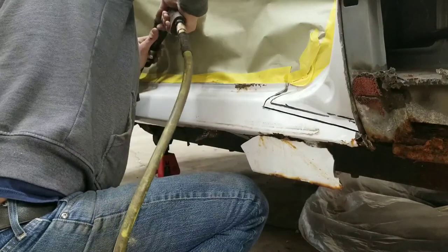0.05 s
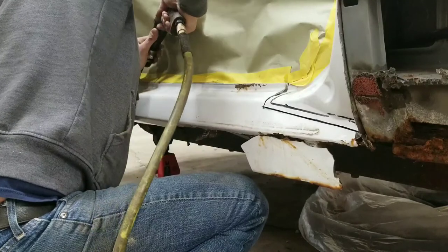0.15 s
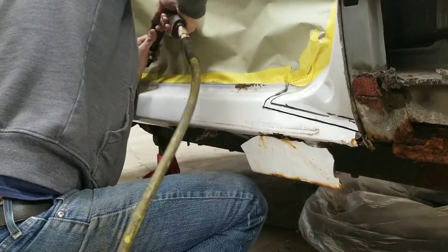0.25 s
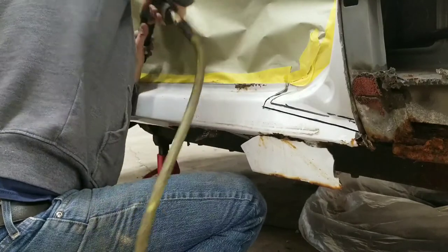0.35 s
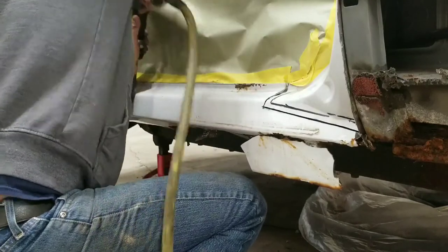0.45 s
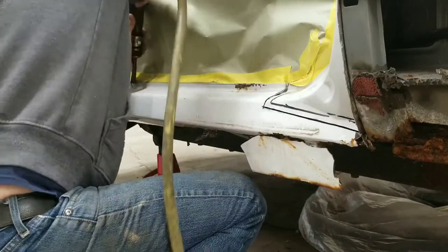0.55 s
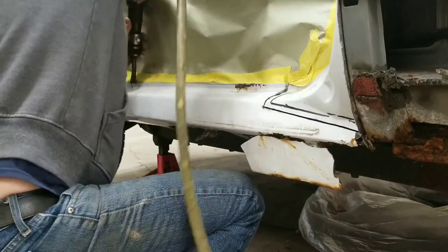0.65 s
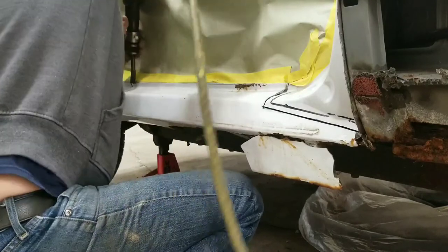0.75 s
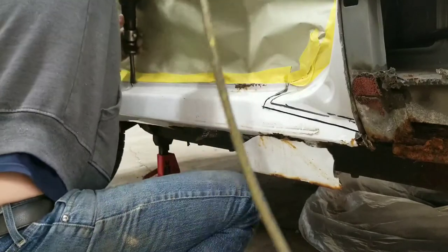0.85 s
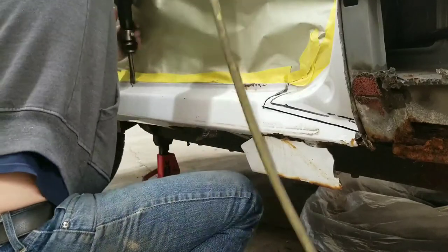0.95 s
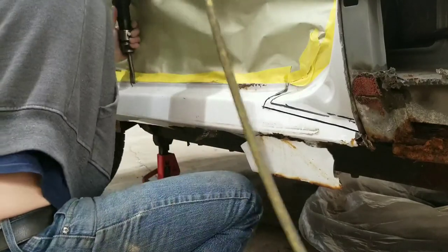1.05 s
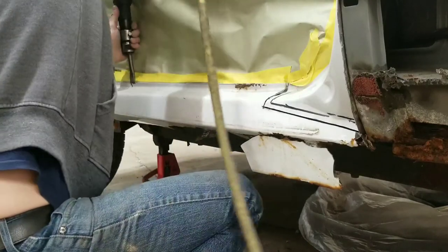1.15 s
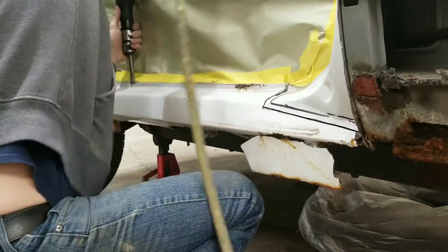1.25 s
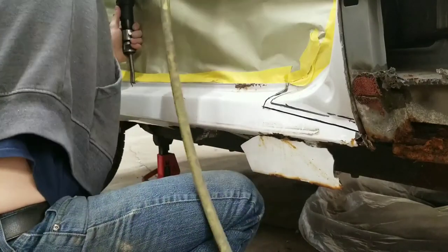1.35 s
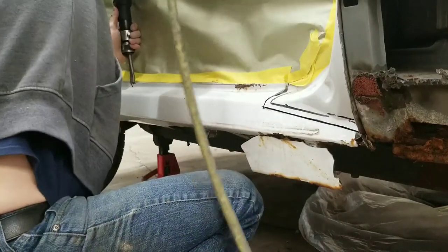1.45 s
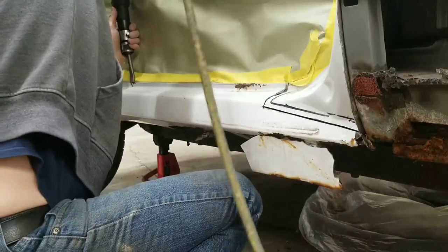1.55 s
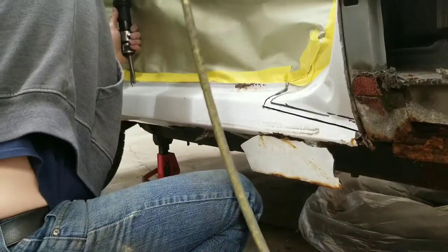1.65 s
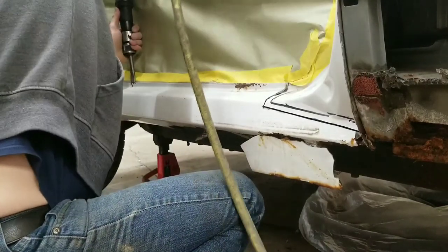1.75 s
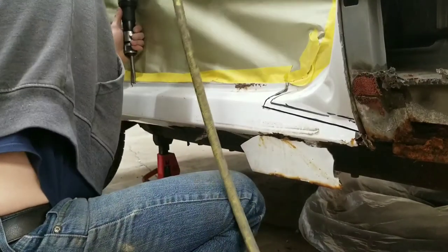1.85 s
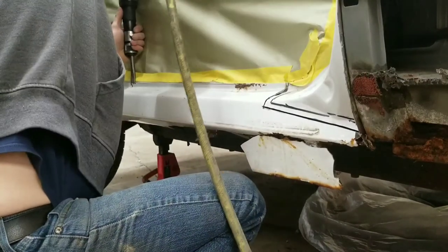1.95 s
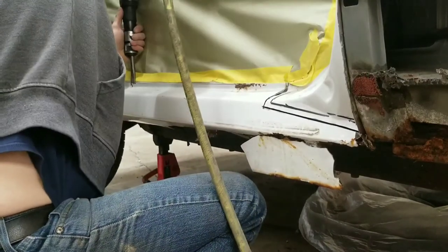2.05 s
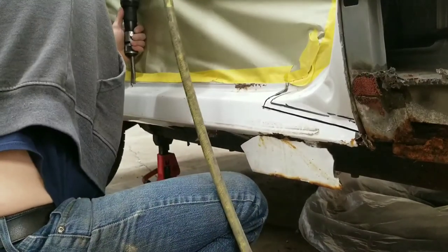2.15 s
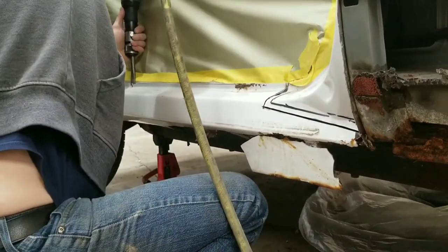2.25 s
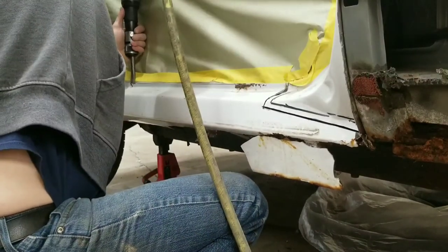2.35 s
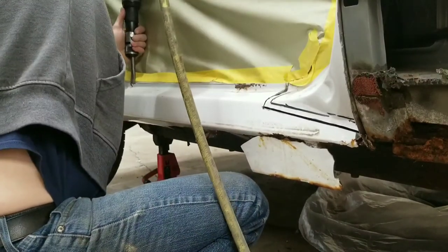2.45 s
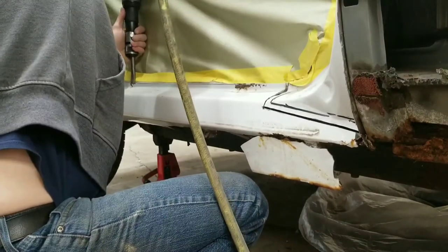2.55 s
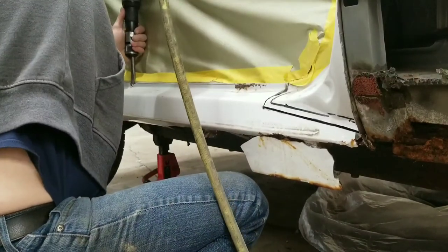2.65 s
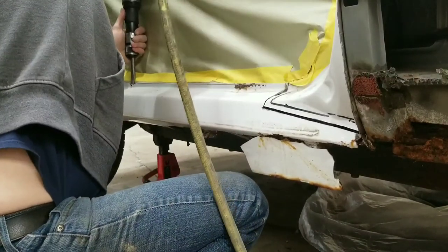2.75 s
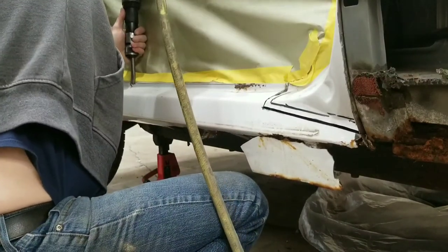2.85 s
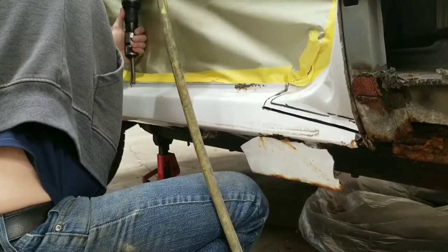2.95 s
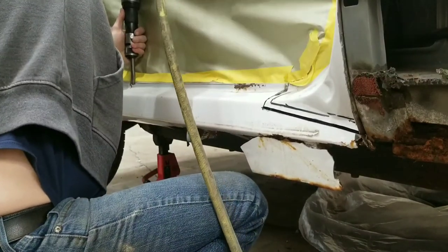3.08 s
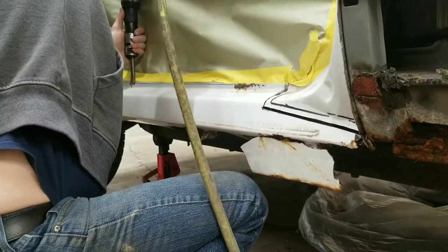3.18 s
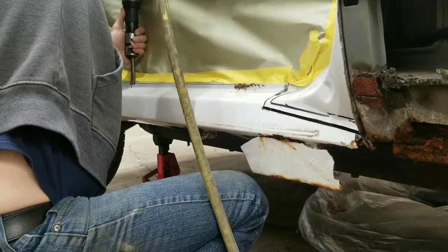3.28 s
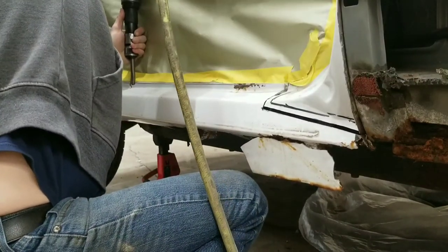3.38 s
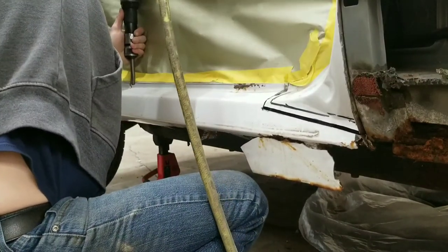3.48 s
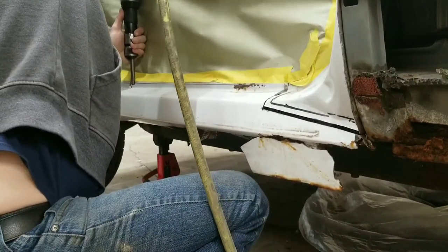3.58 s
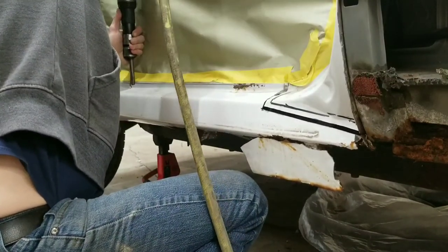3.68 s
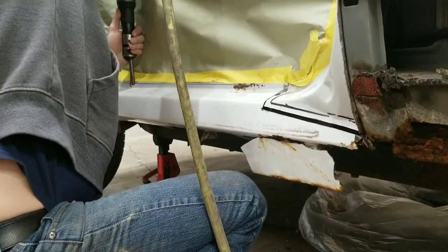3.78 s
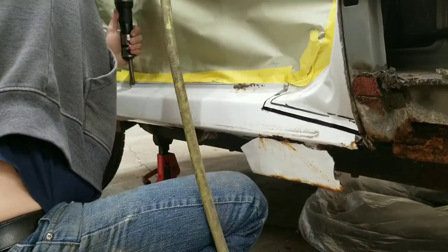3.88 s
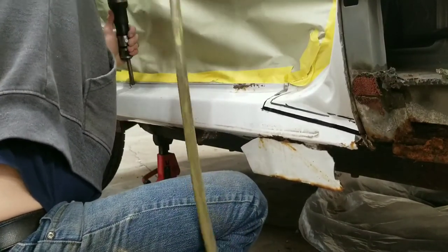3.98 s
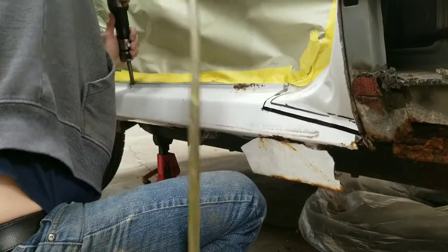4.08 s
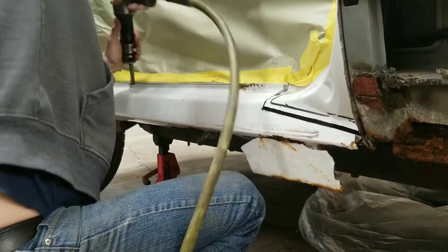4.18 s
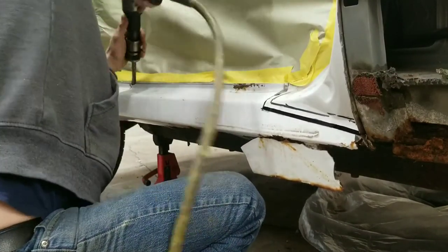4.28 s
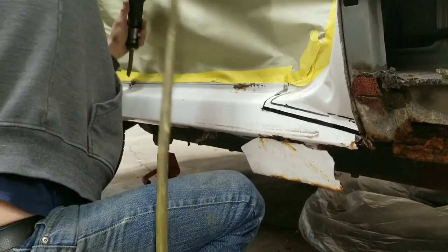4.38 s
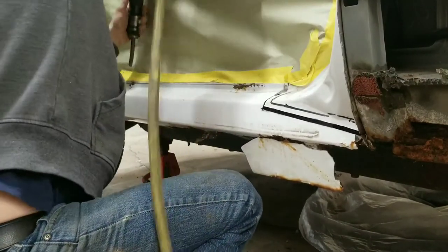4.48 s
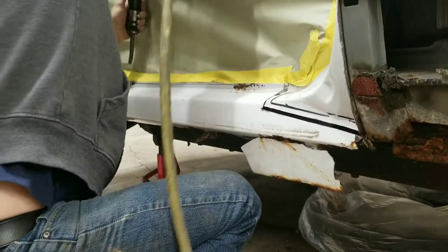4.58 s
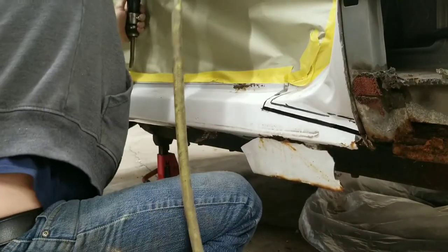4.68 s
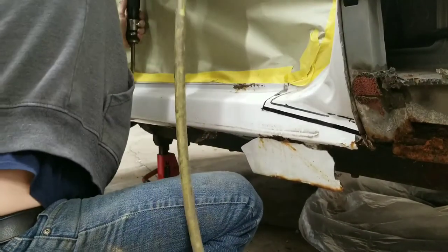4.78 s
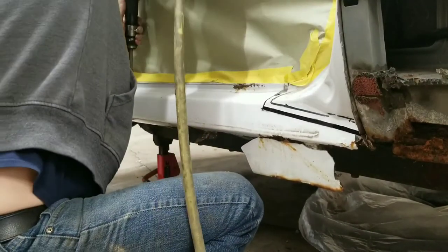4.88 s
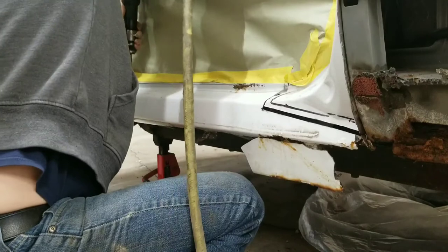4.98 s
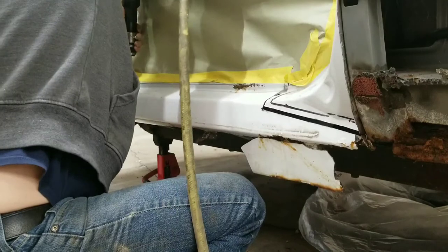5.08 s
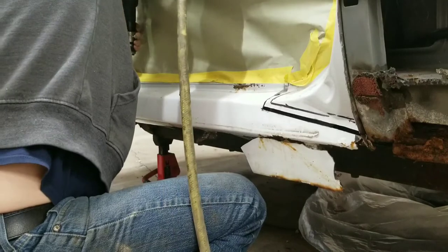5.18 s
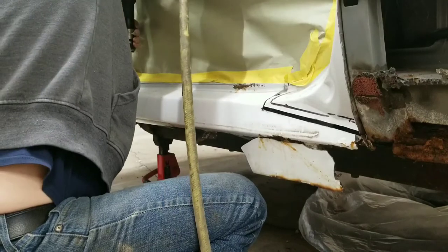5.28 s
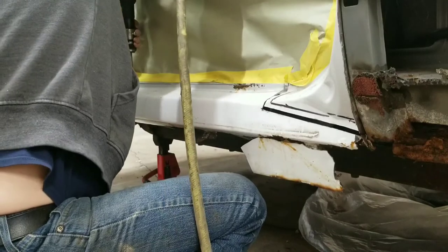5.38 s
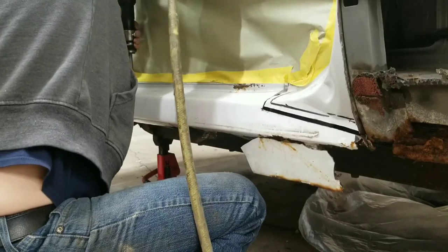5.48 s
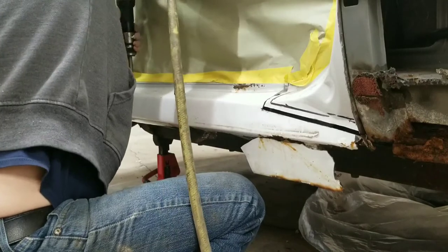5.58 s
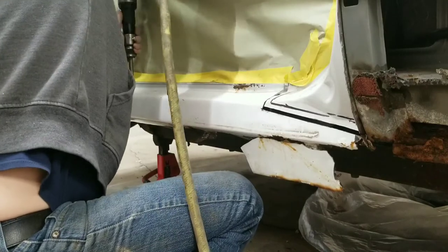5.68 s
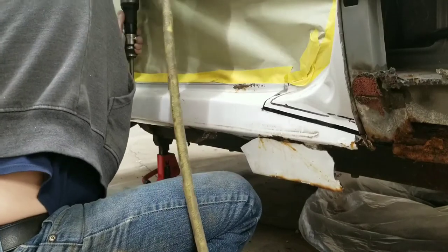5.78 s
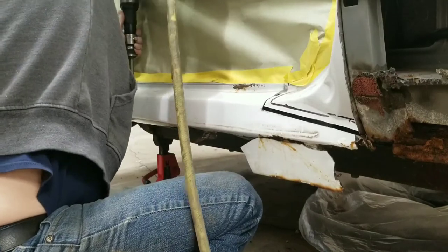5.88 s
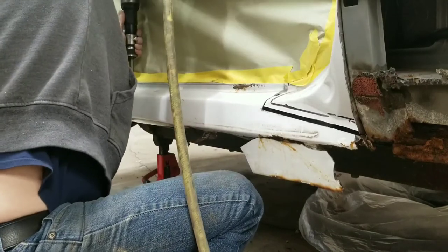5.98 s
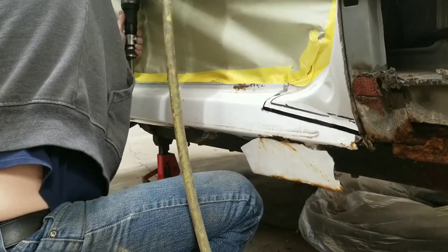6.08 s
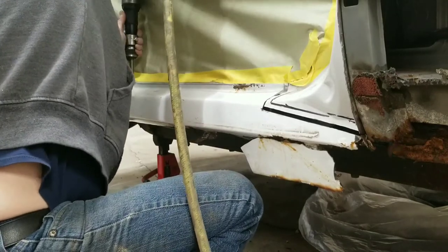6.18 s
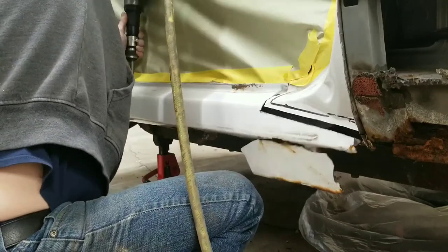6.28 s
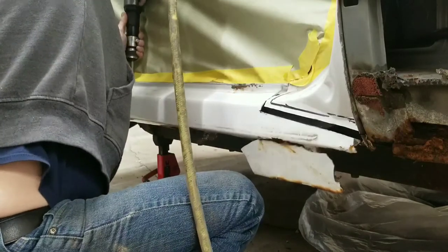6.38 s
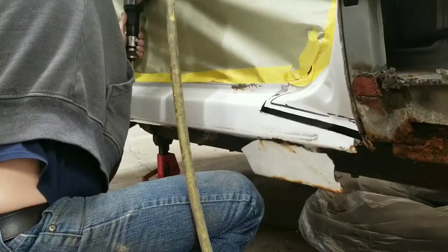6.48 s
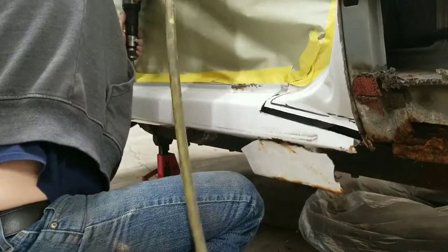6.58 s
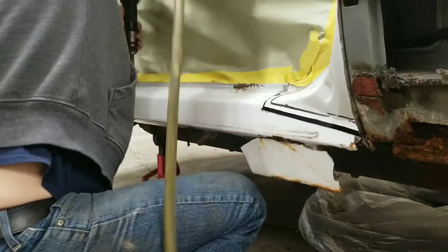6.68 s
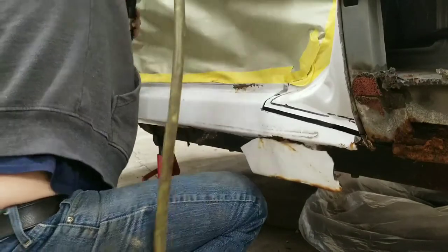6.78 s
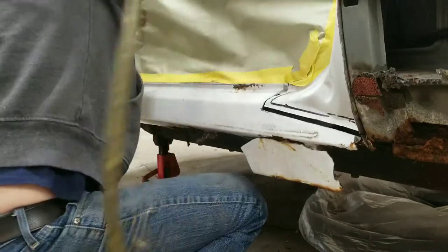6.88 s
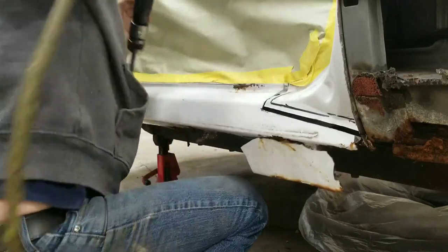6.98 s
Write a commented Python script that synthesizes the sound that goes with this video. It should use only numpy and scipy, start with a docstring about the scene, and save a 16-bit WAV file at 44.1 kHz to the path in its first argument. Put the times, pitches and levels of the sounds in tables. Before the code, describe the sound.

An air hammer chisels a car's steel sill in short, loud, rattling bursts, with light tool bumps and clothes rustling in a reverberant workshop.

```python
"""An air hammer chisels at the welds of a car's steel sill in a reverberant workshop. It opens with one
blow that cracks, rings the chisel and shakes the panel. Tool, hose and clothes shift, the tip bites the
sheet edge, and seven short bursts follow, exhaust air now and then hitting the left microphone port.
In each burst the blows slow and weaken as the air runs down; most end in a lone clack as the piston falls
back. After more bumps and rustling come two last bursts and a final shift of the tool."""
import sys
import numpy as np
from scipy import signal
from scipy.fft import rfft, irfft, next_fast_len
from scipy.io import wavfile
from scipy.ndimage import map_coordinates

SR = 44100
rng = np.random.default_rng(int(sys.argv[2]) if len(sys.argv) > 2 else 0)


def int16_out(signal):
    """Quantize to a 16-bit WAV file."""
    q = np.round(np.clip(np.atleast_2d(signal).T, -1, 1) * 32767)
    wavfile.write(sys.argv[1], SR, q.astype(np.int16))


N = 310464
HIT_TIME = np.arange(SR // 4) / SR  # seconds within one impact

# trigger pulls: start/s, blows, full-speed gap/s, start-up lag/s, last gap/s, piston fall-back/s,
# level/dB, boom trim/dB, sizzle trim/dB, clack level/dB
TRIGGER_PULLS = [(0.0, 1, .04, 0, .04, .146, -3, -4.5, 0, -32),
                 (1.568, 4, .0306, .0102, .062, .122, .5, -1, 3, -22),
                 (1.953, 5, .0337, .0075, .0508, .093, .5, -2.5, 3.5, -17),
                 (2.278, 5, .0295, .0027, .0502, .087, 0, -6, 3.5, -23),
                 (2.618, 6, .0281, .0014, .0595, .107, 0, -8, -1, -22.5),
                 (2.979, 5, .0273, .0018, .0546, .092, 0, -7, 1.5, -21),
                 (3.265, 5, .0272, .0017, .0483, .078, 0, -7, 1, -21),
                 (3.55, 6, .0286, 0, .0645, .115, 1, -7, -1, -28),
                 (5.911, 5, .0285, .0068, .0552, .12, 1, -4, -1.5, -22),
                 (6.178, 6, .026, .0033, .0502, .083, 1.2, -4.5, -8, -23)]
# exhaust air on the left port: t/s, level/dB
EXHAUST_PUFFS = [(0.002, -32), (2.032, -7), (2.068, -16), (2.314, -6.5), (3.008, -12.5)]
# tool and hose bump the sill: t/s, level/dB, thud trim/dB
SILL_BUMPS = [(.407, -50.5, 4), (.78, -34.5, -32), (.854, -39, -25), (1.057, -44.5, -15),
              (1.141, -41.5, -11), (1.178, -32, -10), (1.31, -33.5, -36), (3.914, -32, -16),
              (4.511, -49, -29), (4.637, -47, -11), (4.719, -43.5, -19), (4.926, -38.5, -31),
              (5.366, -39, -1.5), (5.568, -24.5, -5), (5.747, -36, -19), (6.626, -24.5, -17)]
# shifts of body and hose: peak t/s, time to sink 20 dB/s, rub/dB, rustle/dB, rumble/dB
BODY_SHIFTS = [(.56, 0.15, -57.5, -67, -66), (.785, 0.2, -61, -53, -84), (1.19, 0.16, -65, -59, -68),
               (1.42, 0.14, -62.5, -75, -71), (1.505, 0.13, -54, -52, -50), (4.285, 0.094, -56, -60.5, -62),
               (4.46, 0.16, -62.5, -57.5, -84), (4.965, 0.16, -61.5, -73.5, -75),
               (5.37, 0.1, -46, -56, -54), (5.575, 0.11, -39.5, -51, -42.5), (5.63, 0.24, -51, -59.5, -44),
               (5.75, .15, -58, -58.5, -57), (5.905, 0.14, -49, -47.5, -41.5),
               (6.65, 0.088, -40.5, -43.5, -55)]
# the tool's body knocks on the masked panel: t/s, level/dB
PANEL_KNOCKS = [(.558, -67), (1.183, -48.5), (4.968, -56), (5.04, -62), (5.24, -54), (5.277, -45.5),
                (5.335, -40.5), (5.529, -37)]

# ringing modes of the steel: f/Hz, level/dB, t60/s
SILL_MODES = [(138, -8.5, 0.12), (166.6, -6.5, 0.14), (231.3, -0.5, 0.19), (305.3, -4, 0.18),
              (380.8, -5, 0.33), (506.5, 4, 0.15), (564, -6.5, .16), (730, -10, 0.16), (741, 1, 0.15),
              (822, -5.5, 0.11), (974, -4, 0.13), (1296, -6.5, 0.37), (1613, -7.5, 0.49)]
CHISEL_MODES = [(1699, 0, 0.017), (1477, -2.5, 0.015), (2340, -8.5, 0.014), (3040, -23, 0.026),
                (4488, -27.5, 0.014), (6130, -23, 0.011), (7800, -22.5, 0.032)]
TIP_MODES = [(1580, -4.5, 0.042), (1965, -7.5, 0.16), (2490, 1.5, 0.043), (2730, -11, 0.1),
             (3010, -13, 0.092), (3610, -5.5, 0.055)]  # chisel tip on the sheet edge

# noise colours: f/Hz, relative spectral density/dB
ROOM_TONE_EQ = [(25, -11), (55, 7.5), (120, -12.5), (400, -13), (1500, -10.5), (4000, -22), (15000, -25.5)]
CRACK_EQ = [(300, -21.5), (900, -8), (1700, -5), (2400, -9), (3500, -13.5), (7000, -13.5), (9500, -21.5),
            (16000, -10.5)]  # steel on steel
SIZZLE_EQ = [(2000, -50), (7000, -42), (9500, -18), (12000, -7.5), (14500, 4.5), (16000, 3.5)]  # the steel's highest modes
BOOM_EQ = [(25, -11.5), (60, -11.5), (100, -10), (200, -3), (400, -3), (650, 2), (850, 1), (1150, -2.5),
           (1700, -8), (2400, -10), (4000, -17.5), (9500, -35.5)]  # shaken sheet metal
TICK_EQ = [(200, -17.5), (900, -5.5), (1900, 0.5), (4000, -4), (7000, -3.5), (10000, -11), (15000, -8.5)]  # small, hard contact
THUD_EQ = [(30, -15.5), (110, -2), (200, 2), (370, -9), (600, -12.5), (1200, -22), (4000, -47.5)]  # dull body of the sill
RUB_EQ = [(120, -13.5), (350, -0.5), (1100, -1), (2000, -9), (5000, -28.5)]  # clothes, midrange
RUSTLE_EQ = [(500, -17), (1800, 3.5), (3000, 0.5), (8000, -5), (15000, -6.5)]  # clothes, treble
RUMBLE_EQ = [(25, -8.5), (60, -6), (170, 6.5), (300, -8.5), (1000, -51)]  # dragging hose
KNOCK_EQ = [(200, -9), (500, -0.5), (1000, -2), (1900, -4), (3000, -16.5), (8000, -28)]  # padded panel

# likeness of left and right: f/Hz, correlation
STEREO_LIKENESS = [(60, 0.79), (150, 0.95), (300, 0.84), (600, 0.53), (1200, 0.11), (4000, 0.035)]
# workshop reverb: f/Hz, t60/s
REVERB_DECAY = [(80, 0.75), (300, 0.8), (1000, 0.67), (3000, 0.58), (7000, 0.45), (11000, 0.41),
                (15000, 0.19)]


def amp(db):
    """Decibels to gain."""
    return 10 ** (np.asarray(db) / 20)


def curve_at(points, hz):
    """Read a frequency curve on a log axis."""
    freqs, values = np.transpose(points)
    return np.interp(np.log(hz + 1), np.log(freqs), values)


def stereo(spectra, hz):
    """Two unrelated spectra become left and right, narrow in the bass and wide on top."""
    turn = np.arccos(np.clip(curve_at(STEREO_LIKENESS, hz), -1, 1)) / 2
    mid, side = spectra[0] * np.cos(turn), spectra[1] * np.sin(turn)
    return np.array([mid + side, mid - side])


def noise(eq, size, ragged_db=0, spacing_hz=170):
    """Coloured stereo noise of rms 1, with chance peaks and dips where modes crowd or thin out."""
    hz = np.fft.rfftfreq(size, 1 / SR)
    peaks_db = ragged_db * np.interp(hz / spacing_hz, np.arange(512), rng.standard_normal(512))
    white = stereo(rfft(rng.standard_normal((2, size))), hz)
    coloured = irfft(white * amp(curve_at(eq, hz) + peaks_db), size)
    return coloured / np.std(coloured)


def envelope(t60, rise):
    """An impact's fast attack and exponential decay, both set in seconds."""
    return amp(-60 * HIT_TIME / t60) * (1 - np.exp(-HIT_TIME / rise))


def noise_hit(eq, t60, rise):
    """Countless close modes struck at once, a new mix each time: ragged noise that dies away."""
    return noise(eq, len(HIT_TIME), ragged_db=2.3) * envelope(t60, rise)


def ring(modes, rise, width_rad, detune_cycles=.5):
    """Distinct modes, varied in pitch and strength per strike and spread in phase between the ports."""
    hz, db, t60 = np.transpose(modes)[:, :, None]
    hz = hz + detune_cycles * rng.standard_normal(hz.shape) / t60  # damped modes vary most with the grip
    lead = width_rad * rng.standard_normal(hz.shape)
    phase = rng.uniform(0, 2 * np.pi, hz.shape) + np.array([lead, -lead]) / 2
    gain = amp(db + rng.standard_normal(hz.shape))
    return np.sum(gain * envelope(t60, rise) * np.sin(2 * np.pi * hz * HIT_TIME + phase), axis=1)


def flutter(size, rate_hz, depth_db):
    """A gain of rms 1 that jumps about at random."""
    knots = rng.standard_normal(int(size * rate_hz / SR) + 4)
    wobble = map_coordinates(knots, [np.arange(size) * rate_hz / SR])
    gain = amp(depth_db * np.clip(wobble, -2, 2))
    return gain / np.sqrt(np.mean(gain ** 2))


def add(track, start, sound):
    """Mix a sound into the track from start seconds on."""
    part = track[..., max(round(start * SR), 0):][..., :sound.shape[-1]]
    part += sound[..., :part.shape[-1]]


def room_tone():
    """The quiet air of the workshop, under everything."""
    return amp(-71) * noise(ROOM_TONE_EQ, N)


def workshop(direct, wet_db, build_s):
    """An impact plus its reverb, which builds as the walls answer and dies first in the treble."""
    hz, t, spectra = signal.stft(rng.standard_normal((2, SR)), SR, nperseg=256)
    decay = amp(-60 * t / curve_at(REVERB_DECAY, hz)[:, None])
    build = 1 - np.exp(-(t / build_s) ** 2)
    tail = signal.istft(stereo(spectra, hz[:, None]) * decay * build, SR, nperseg=256)[1]
    out = amp(wet_db) * signal.fftconvolve(direct[:1], tail / np.linalg.norm(tail[0]), axes=1)
    out[:, :direct.shape[1]] += direct
    return out


def sizzle(db, t60, rise):
    """The highest modes of the steel, louder on the left."""
    return amp(db + np.array([[4.5], [-4.5]])) * noise_hit(SIZZLE_EQ, t60, rise)


def blow(chisel_db, panel_db, boom_db, sizzle_db):
    """Steel on steel clanks and cracks at once; the sheet metal takes some milliseconds to boom."""
    # the wide panel fills the room
    crack = amp(-3) * noise_hit(CRACK_EQ, t60=.16, rise=.00033)
    fizz = sizzle(sizzle_db - 5.5, t60=.14, rise=.001)
    sheet = amp(5) * noise_hit(BOOM_EQ, t60=.11, rise=.011)
    sill = amp(-10.2) * ring(SILL_MODES, rise=.002, width_rad=.9)
    chatter = flutter(len(HIT_TIME), rate_hz=520, depth_db=-1.5)  # the tip bounces on the torn seam
    panel = chatter * (crack + fizz) + amp(boom_db) * (sheet + sill)
    out = amp(panel_db) * workshop(panel, wet_db=-2.5, build_s=.0044)
    # the thin chisel stays dry: a bright snap, then its bending modes
    snap = sizzle(sizzle_db + 8, t60=.011, rise=.0004)
    click = amp(-2.5) * noise_hit(TICK_EQ, t60=.011, rise=.0022)
    chisel = amp(7.2) * ring(CHISEL_MODES, rise=.00054, width_rad=1)
    add(out, 0, amp(chisel_db) * snap)
    add(out, .0007, amp(chisel_db) * (click + chisel))
    return out


def piston_rhythm(start, blows, full_gap, lag, last_gap):
    """Blow times and the gap before each: a slow start, full speed, then the air runs down."""
    to_go = np.arange(blows)[::-1]
    run_down = .3 ** (to_go ** 2)  # the slowing falls almost wholly on the last two gaps
    gaps = full_gap + (last_gap - full_gap) * run_down
    gaps[:2] += lag
    return start + np.cumsum(gaps) - gaps[0], gaps


def hammer(full_pressure_gap_s=.026, droop_db_per_s=-6, scatter_db=.6):
    """Bursts of piston blows: hose pressure sags under the trigger; slow blows are weaker and thinner."""
    out = np.zeros((2, N))
    next_starts = [pull[0] for pull in TRIGGER_PULLS[1:]] + [np.inf]
    for pull, next_start in zip(TRIGGER_PULLS, next_starts):
        start, blows, full_gap, lag, last_gap, fall_back, db, boom_db, sizzle_db, clack_db = pull
        times, gaps = piston_rhythm(start, blows, full_gap, lag, last_gap)
        levels = db + droop_db_per_s * (times - start) + scatter_db * rng.standard_normal(len(times))
        slowness = gaps / full_pressure_gap_s - 1
        for k, (t, slow, level) in enumerate(zip(times, slowness, levels)):
            # the first blow has the whole stroke to gather speed, but start-up lag softens it
            accent_db = 2.4 - 900 * lag if k == 0 else 0
            chisel_db = level - 15.5 - 2 * slow + accent_db
            panel_db = level - 11 - 11.5 * slow + .3 * accent_db
            add(out, t, blow(chisel_db, panel_db, boom_db, sizzle_db + 2.5 * slow))
        if times[-1] + fall_back < next_start:  # the piston falls back unless the next burst catches it
            add(out, times[-1] + fall_back, amp(clack_db) * clack())
    return out


def exhaust(start_hz=170, end_hz=58, settle_s=.0024):
    """A slug of air shoves the left diaphragm, which swings back ever more slowly: a low pop."""
    out = np.zeros(N)
    hz = end_hz + (start_hz - end_hz) * np.exp(-HIT_TIME / settle_s)
    swing = -np.sin(2 * np.pi * np.cumsum(hz) / SR) * envelope(t60=.09, rise=.0012)
    for t, db in EXHAUST_PUFFS:
        add(out, t, amp(db) * swing)
    return out * amp([[0], [-20]])


def clack():
    """With the air cut off the piston only taps the chisel, and the panel barely stirs."""
    chisel = amp(3.5) * ring(CHISEL_MODES, rise=.00014, width_rad=.91)
    crack = amp(-.5) * noise_hit(CRACK_EQ, t60=.041, rise=.00086)
    fizz = sizzle(db=-5, t60=.036, rise=.0004)
    out = workshop(crack + fizz, wet_db=-4, build_s=.0027)
    add(out, 0, chisel)
    return out


def bumps(ticks_per_shift=2, spread_s=.078):
    """Light contacts as the tool is moved: a click, a short ringing scrape and a dull thud of the sill."""
    out = np.zeros((2, N))
    # faint extra ticks as each shift dies away
    strays = [(t + spread_s * rng.random(), rustle_db + 1.5, -12)
              for t, _, _, rustle_db, _ in BODY_SHIFTS for _ in range(ticks_per_shift)]
    for t, db, thud_db in SILL_BUMPS + strays:
        click = amp(-4.5) * noise_hit(TICK_EQ, t60=.0079, rise=.0003)
        fizz = sizzle(db=-16.5, t60=.02, rise=.0003)
        scrape = amp(-11.5) * noise_hit(TICK_EQ, t60=.09, rise=.00071)
        tip = amp(-18.5) * ring(TIP_MODES, rise=.00061, width_rad=.88)
        thud = amp(thud_db + 8) * noise_hit(THUD_EQ, t60=.074, rise=.019)
        add(out, t, amp(db) * workshop(click + fizz + scrape + tip + thud, wet_db=-9, build_s=.0073))
    return out


def handling(swell_db_per_s=259):
    """Each shift swells and fades: clothes rub and rustle in small catches, the dragged hose rumbles."""
    t = np.arange(N) / SR
    layers = noise(RUB_EQ, N), noise(RUSTLE_EQ, N), noise(RUMBLE_EQ, N)
    gains = np.zeros((len(layers), N))
    for peak, sink_s, *levels in BODY_SHIFTS:
        shape_db = np.minimum(swell_db_per_s * (t - peak), -20 * (t - peak) / sink_s)
        gains = np.maximum(gains, amp(levels)[:, None] * amp(shape_db))
    catches = flutter(N, rate_hz=170, depth_db=4)
    return catches * sum(layer * gain for layer, gain in zip(layers, gains))


def knocks():
    """The tool's body meets the masked panel: no click, only a short hollow ring of the sheet."""
    out = np.zeros((2, N))
    for t, db in PANEL_KNOCKS:
        hollow = noise_hit(KNOCK_EQ, t60=.085, rise=.00081)
        add(out, t, amp(db) * workshop(hollow, wet_db=-6, build_s=.006))
    return out


def bite(start_s=1.527):
    """One lone stroke seats the chisel: its tip clanks on the sheet edge."""
    out = np.zeros((2, N))
    tip = ring(TIP_MODES, rise=.00061, width_rad=.72)
    edge = amp(3) * noise_hit(TICK_EQ, t60=.036, rise=.0006)
    fizz = sizzle(db=7.5, t60=.03, rise=.0004)
    thud = amp(-3) * noise_hit(THUD_EQ, t60=.11, rise=.0065)
    add(out, start_s, clack())
    add(out, start_s + .0015, workshop(tip + edge + fizz + thud, wet_db=-9.5, build_s=.0024))
    return amp(-22) * out


def scene():
    """The tool, nudged to the right, with its exhaust, the worker's movements and the room tone."""
    tool = (hammer() + bite() + bumps() + knocks()) * amp([[-.4], [.4]])
    return tool + exhaust() + handling() + room_tone()


def record(dry, top_hz=15950, edge_hz=300):
    """Hard clipping at full scale, then a steep high cut."""
    size = next_fast_len(N + SR // 2)
    hz = np.fft.rfftfreq(size, 1 / SR)
    ramp = np.clip((top_hz - hz) / edge_hz + .5, 0, 1)
    high_cut = np.sin(ramp * np.pi / 2) ** 2
    return irfft(rfft(np.clip(dry, -1, 1), size) * high_cut, size)[:, :N]


dry = scene()
out = record(dry)
int16_out(out)
```